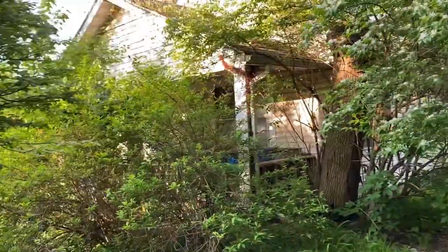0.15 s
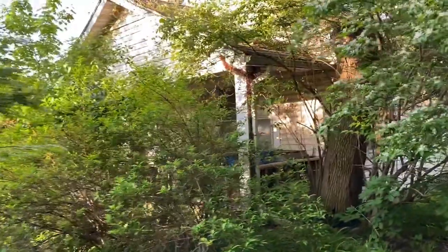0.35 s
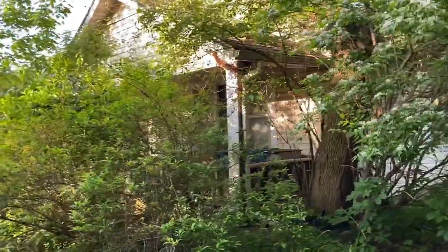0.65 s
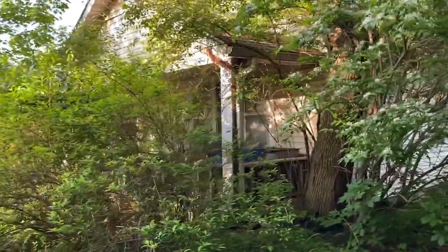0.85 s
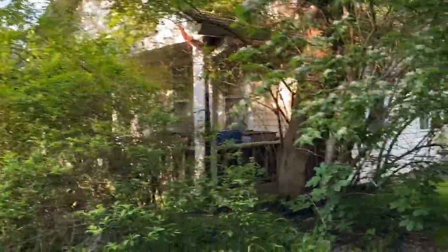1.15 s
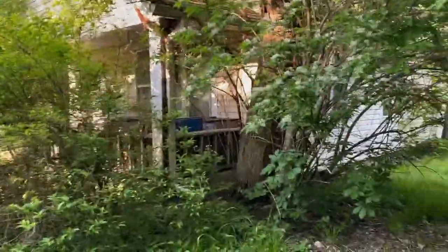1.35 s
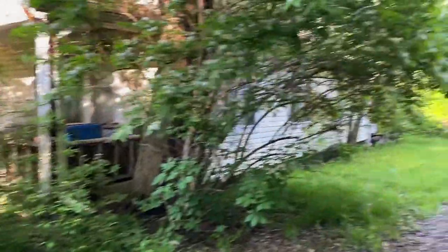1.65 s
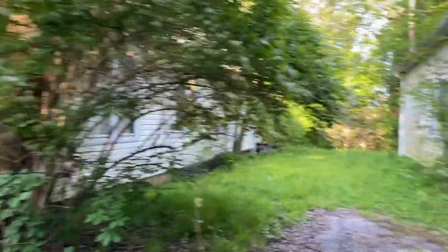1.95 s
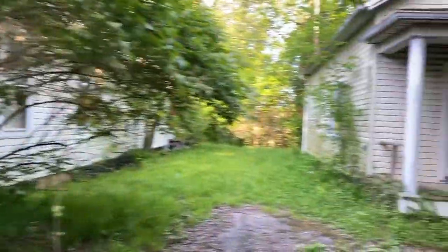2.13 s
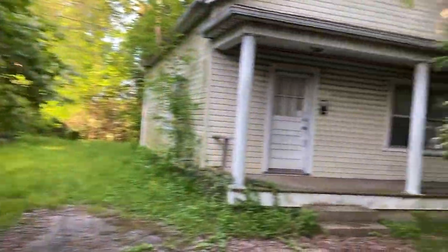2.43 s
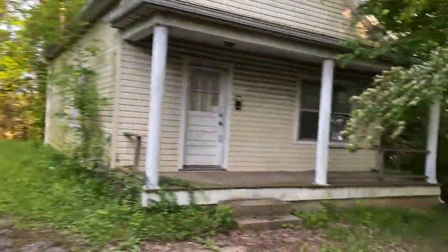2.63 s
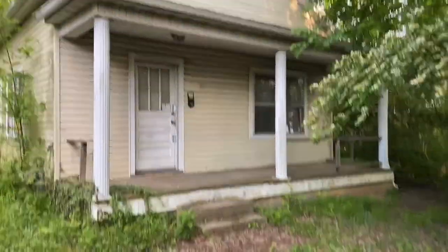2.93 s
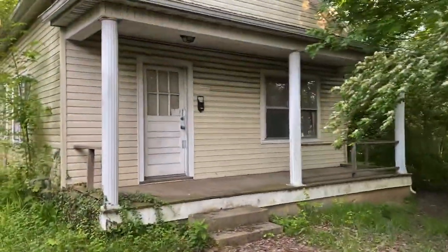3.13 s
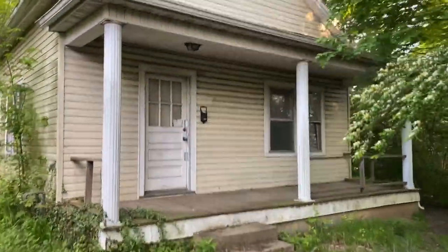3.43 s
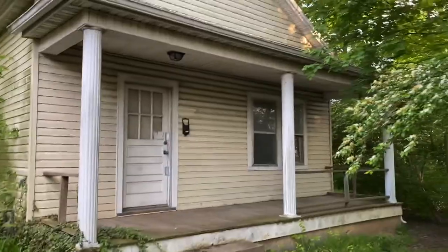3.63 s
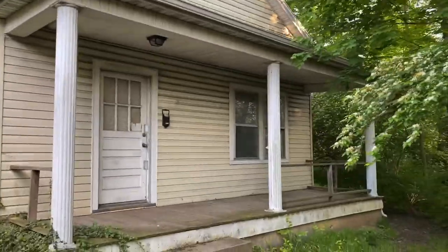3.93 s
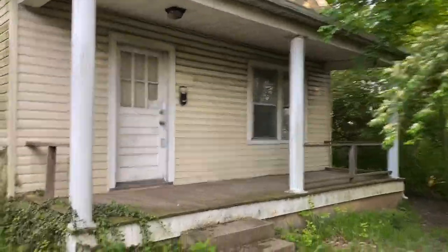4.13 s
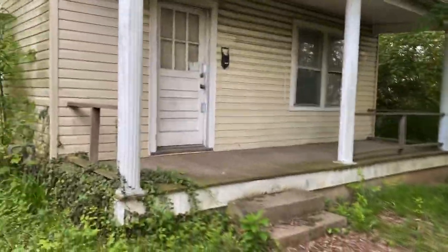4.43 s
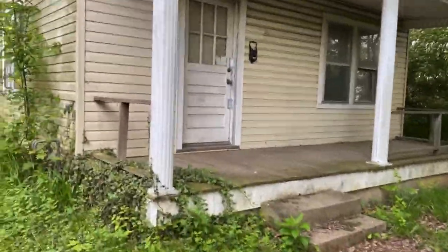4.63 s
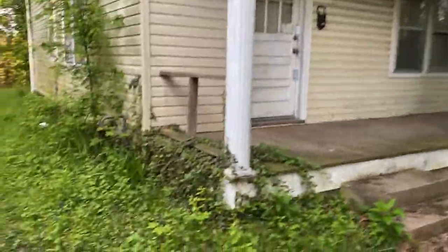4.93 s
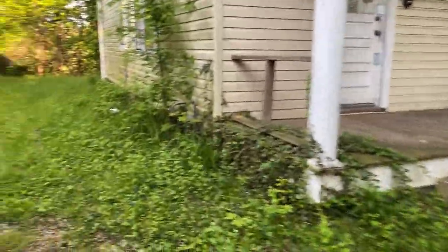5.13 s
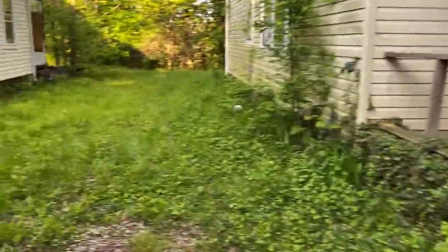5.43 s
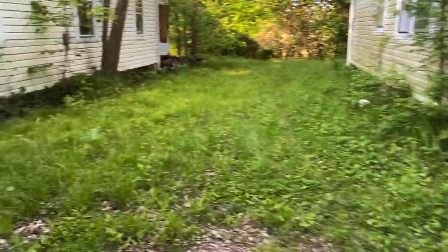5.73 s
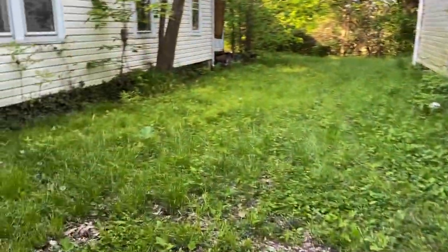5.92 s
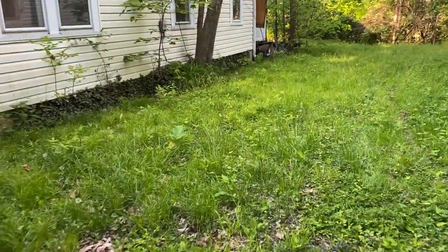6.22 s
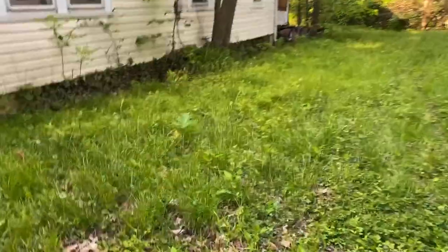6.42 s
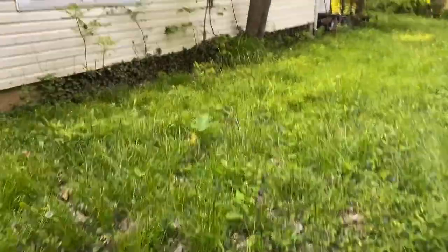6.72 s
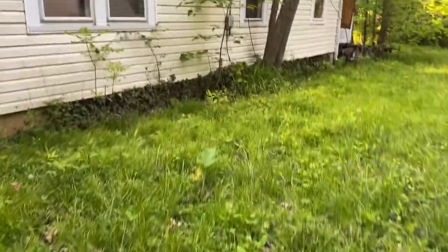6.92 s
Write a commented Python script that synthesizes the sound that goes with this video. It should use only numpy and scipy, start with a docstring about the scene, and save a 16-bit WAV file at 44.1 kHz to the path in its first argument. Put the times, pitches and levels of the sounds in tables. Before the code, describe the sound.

A quiet overgrown yard heard from a walker's handheld stereo microphone. Low wind gusts open over distant wash and blurred bird warbles. Quiet footfalls become clearer crunches with small twig knocks and dry crackles. A short, high bird call repeats roughly every second from the middle on. Later, soft heel thuds and brief grass squeaks join swishier steps, and wind bumps return near the end.

```python
"""Someone walks slowly through long grass in a quiet yard: noise grains swish, rattle and crunch.
From the start wind rumbles as low noise, a distant hum wavers and far warbles blur into noise.
Soon dry stems crackle and twigs snap as struck rings; far birds slur in an echo haze, nearer ones whistle.
Later heels thud as brief damped tones; last to join are grass blades that slip with a squeak and a scrape."""
import sys
import numpy as np
from scipy import signal
from scipy.fft import rfft, irfft
from scipy.io import wavfile
from scipy.ndimage import uniform_filter1d

SR = 44100
rng = np.random.default_rng(int(sys.argv[2]) if len(sys.argv) > 2 else 0)


def output_pcm(signal):
    """Save a mono or channel-first signal as 16-bit PCM at the path in sys.argv[1].

    Samples are clipped to [-1, 1] before scaling.
    """
    pcm = np.clip(np.atleast_2d(signal).T, -1, 1) * 32767
    wavfile.write(sys.argv[1], SR, np.round(pcm).astype(np.int16))


N = 311787
TIME = np.arange(N) / SR
BINS = np.fft.rfftfreq(N, 1 / SR)

# left-right correlation of far sound: (frequency [Hz], likeness [0-1])
FAR_LIKENESS = [(30, 0.7), (150, 0.81), (500, 0.17), (1000, 0.017), (2500, 0.18), (11000, 0.17)]
# larger twigs breaking: (time [s], relative knock level [dB], knock pitch [Hz], relative crack level [dB])
TWIG_BREAKS = [(0.5817, -33.5, 920, -38.5), (0.7132, -38, 1780, -44), (1.144, -42.5, 1600, -62),
               (1.6904, -29, 1400, -62), (1.6989, -21, 1800, -61), (1.703, -26, 1840, -65),
               (1.7427, -32.5, 765, -62), (1.8254, -34.5, 940, -42), (1.8661, -21.5, 1170, -34.5),
               (2.345, -35.5, 970, -59), (2.414, -13, 1200, -20.5), (2.735, -38, 1020, -44.5),
               (2.822, -35.5, 868, -36.5), (3.24, -38.5, 1490, -42), (3.474, -31, 930, -70),
               (3.484, -34.5, 1070, -35), (3.935, -38.5, 1630, -56), (4.035, -40.5, 1750, -37),
               (5.012, -36, 1090, -75), (5.1346, -40.5, 1200, -34.5), (5.7929, -27, 1180, -40),
               (5.8718, -35, 1020, -58), (5.9, -44, 1050, -51), (5.921, -39, 965, -50),
               (6.1753, -39.5, 1320, -64), (6.3069, -33.5, 660, -41), (6.3427, -36.5, 1160, -58),
               (6.7555, -45, 1500, -52), (6.8479, -30.5, 1160, -56)]


def amp(db):
    """Decibels to gain."""
    return 10 ** (np.asarray(db) / 20)


def unit(x):
    """Scales to rms 1."""
    return x / np.sqrt(np.mean(x ** 2) + 1e-20)


def read(points, hz):
    """Reads a spectrum on a log-frequency axis."""
    f, value = np.transpose(points)
    return np.interp(np.log(hz + 1), np.log(f + 1), value)


def follow(rows):
    """Joins the rows of a control table by straight lines: one curve a column."""
    s, *columns = np.transpose(rows)
    return [np.interp(TIME, s, c) for c in columns]


def add(mix, s, sound):
    """Lays a sound into the mix at time s."""
    part = mix[max(round(s * SR), 0):][:len(sound)]
    part += sound[:len(part)]


def swell(peak_s, width_s):
    """Gaussian rise and fall around one moment."""
    return np.exp(-((TIME - peak_s) / width_s) ** 2)


def drift(rate_hz):
    """Smooth noise of rms 1, changing up to about rate_hz times a second."""
    spectrum = rfft(rng.standard_normal(N))
    return unit(irfft(spectrum * np.exp(-(BINS / rate_hz) ** 2), N))


def ring(points, stretch=1, size=4096):
    """Causal minimum-phase ring of energy 1 with the given spectrum, stretched in pitch."""
    hz = abs(np.fft.fftfreq(size, 1 / SR)) / stretch
    log_gain = np.log(amp(read(points, hz)))
    response = np.fft.ifft(np.exp(signal.hilbert(log_gain).conj())).real[:size // 2]
    return response / np.linalg.norm(response)


def colour(x, points):
    """Passes both channels through a ring."""
    return signal.oaconvolve(x, ring(points)[None], axes=1)[:, :N]


def pair(x, likeness):
    """Blends two unrelated signals into a left and right that are partly alike."""
    a, b = rfft(x)
    same = np.clip(read(likeness, BINS), 0, .99)
    mid = a * np.sqrt((1 + same) / 2)
    side = b * np.sqrt((1 - same) / 2)
    return irfft(np.array([mid + side, mid - side]), N)


def from_below(x):
    """Ground sound bends round the microphones' housing: phase and level differ between the two ports."""
    # (frequency [Hz], left lead [rad])
    port_phase = [(0, 0), (1700, -.1), (4700, 2.1), (5700, 4.4), (8300, 8.4), (9400, 7.9), (13500, 3.4),
                  (15500, .1)]
    # (frequency [Hz], left minus right [dB])
    port_balance = [(60, -2.5), (1200, -3), (2500, -3), (4000, -0.5), (5400, 5.5), (6800, -7), (8200, -6),
                    (10000, 0.5)]
    f, phase = np.transpose(port_phase)
    turn = np.exp(-1j * np.interp(BINS, f, phase))
    tilt = amp(read(port_balance, BINS) / 2)
    return irfft(rfft(x) * np.array([tilt, turn / tilt]), N)


def grains(per_s, spread_db, smooth, flicks_per_s, flick_decay_s, steady, patchy_db):
    """Tiny fractures over smooth rubbing, in bursts as single stems spring free; two unrelated trains."""
    size = amp(spread_db * np.minimum(rng.exponential(1, (2, N)), 4.5))
    struck = rng.random((2, N)) < per_s / SR
    clicks = unit(size * rng.choice([-1, 1], (2, N)) * struck)
    share = np.clip(smooth, 0, 1)
    both = np.sqrt(1 - share) * clicks + np.sqrt(share) * rng.standard_normal((2, N))
    # each flick starts at once and decays exponentially
    flicks = rng.random(N) * (rng.random(N) < flicks_per_s / SR)
    bursts = unit(signal.lfilter([1], [1, -np.exp(-1 / (flick_decay_s * SR))], flicks))
    # every stem has its own pitch, so the colour shifts from moment to moment
    z = signal.stft(both * (steady + bursts), nperseg=128)[2]
    patches = uniform_filter1d(rng.standard_normal(z.shape[1:]), size=4, axis=0)
    patches = unit(uniform_filter1d(patches, size=12, axis=1))
    return unit(signal.istft(z * amp(patchy_db * patches), nperseg=128)[1][:, :N])


def outdoors(x, t60_s, delay_s):
    """Sparse decaying echoes scattered by leaves and house walls."""
    t = np.arange(SR // 2) / SR
    hits = rng.random((2, len(t))) < 2500 / SR
    taps = rng.standard_normal((2, len(t))) * hits * amp(-60 * t / t60_s) * (t > delay_s)
    taps = taps / np.linalg.norm(taps, axis=1, keepdims=True)
    return signal.oaconvolve(x[None], taps, axes=1)[:, :N]


def wind():
    """Low eddies on the microphone: a light breeze with a few gusts."""
    # (frequency [Hz], relative density [dB per Hz])
    wind_colour = [(20, -21.5), (32, -16.5), (42, -8.5), (55, 1.5), (105, -4.5), (200, -19.5), (450, -50.5),
                   (1500, -108)]
    # (time [s], level [dB])
    breeze = [(0, -49), (1.2, -52), (1.3, -60.5), (2.93, -60), (3.02, -52), (4.9, -53.5), (5.3, -50.5),
              (5.95, -51.5), (6.15, -58.5), (7.07, -47)]
    # swells over the breeze: (peak time [s], half width [s], level [dB])
    gusts = [(.19, 0.052, -37.5), (.53, 0.15, -38.5), (1.79, 0.22, -49.5), (6.3, 0.063, -44.5),
             (6.415, 0.045, -38), (6.53, 0.11, -42.5), (6.95, 0.22, -50.5)]
    breeze_db, = follow(breeze)
    gust_power = sum((amp(db) * swell(s, width_s)) ** 2 for s, width_s, db in gusts)
    power = amp(breeze_db) ** 2 + gust_power
    eddies = pair(colour(rng.standard_normal((2, N)), wind_colour), FAR_LIKENESS)
    # flatten the noise's own level so that the curve sets it
    strength = np.sqrt(uniform_filter1d((eddies ** 2).mean(0), size=4000))
    return eddies / strength * np.sqrt(power)


def yard():
    """A wash of far traffic and leaves that swells once, and a wavering machine hum on the right."""
    # far surroundings: (frequency [Hz], relative density [dB per Hz])
    yard_colour = [(30, -12), (70, 7.5), (160, 4.5), (280, -2.5), (420, -3.5), (750, 0.5), (1100, -3),
                   (1600, -9.5), (2400, -22.5), (4500, -27.5), (5500, -33.5), (7400, -35.5), (8150, -27),
                   (8800, -39), (16000, -43.5)]
    # machine hum: (time [s], relative level [dB])
    hum_levels = [(2.2, -62.5), (2.5, -53), (2.8, -52.5), (3.5, -56.5), (4.9, -61.5), (5.3, -58),
                  (6.9, -51.5)]
    air = grains(per_s=3000, spread_db=2.5, smooth=0.93, flicks_per_s=79, flick_decay_s=0.014,
                 steady=22.0, patchy_db=1.92)
    wash = pair(colour(air, yard_colour), FAR_LIKENESS) * amp(-57.5 + 2 * swell(3.34, 0.6))
    level_db, = follow(hum_levels)
    hum_hz = 156.5 + 1.384 * drift(5.8)
    hum_gain = amp(level_db - 2.5 + 1.7 * drift(8.3))
    hum = np.sqrt(2) * np.sin(2 * np.pi * np.cumsum(hum_hz) / SR) * hum_gain
    return wash * amp([[-.3], [.3]]) + hum * amp([[-2.6], [1.8]])


def gait():
    """Stirring of blades, stalks and litter: a foot lands, presses and lets go; the other leg swings by."""
    # a little under two a second: (time [s], rise [s], relative blades, stalks, litter level [dB])
    footfalls = [(-.06, 0.052, -78.5, -69, -59), (0.496, 0.014, -73.5, -69.5, -56),
                 (1.04, 0.17, -78, -67.5, -77), (1.638, 0.033, -70, -60, -51.5),
                 (2.27, 0.039, -71.5, -65, -54.5), (2.8, 0.1, -68, -84, -51.5),
                 (3.4, 0.074, -71.5, -85, -51), (3.949, 0.067, -67, -71, -52.5),
                 (4.51, 0.032, -64, -59, -55), (5.078, 0.12, -67, -70.5, -53.5),
                 (5.68, 0.05, -62.5, -67, -49), (6.267, 0.02, -70.5, -78, -52.5),
                 (6.843, 0.035, -72, -77, -52)]
    # leg through taller growth: (peak time [s], half width [s], relative level [dB])
    sweeps = [(.13, 0.13, -82.5), (.67, 0.03, -85), (1.26, 0.026, -73.5), (1.53, 0.1, -79),
              (3.04, 0.038, -86), (3.25, 0.063, -74.5), (4.3, 0.21, -82.5), (4.73, 0.067, -75.5),
              (5.34, 0.087, -80.5), (5.6, 0.15, -73), (5.92, 0.12, -75), (6.18, 0.095, -76.5),
              (6.5, 0.056, -83), (7.06, 0.033, -80)]
    # what the passing leg stirs: blades, stalks, litter gain [dB]
    sweep_mix_db = [2.5, 2.5, 7]
    hold_s, settle_db_per_s = 0.0084, 90.5
    shake_db, shake_db_per_s = -38, 203
    power = np.zeros((3, N))
    for s, rise_s, *levels_db in footfalls:
        landing = np.sin(np.pi / 2 * np.clip((TIME - s) / rise_s, 0, 1)) ** 2
        settling = amp(-settle_db_per_s * np.maximum(TIME - s - rise_s - hold_s, 0))
        power += (amp(levels_db)[:, None] * landing * settling) ** 2
    sweeping = sum((amp(db) * swell(s, width_s)) ** 2 for s, width_s, db in sweeps)
    power += amp(sweep_mix_db)[:, None] ** 2 * sweeping
    # each twig's crack shakes the blades around it
    for s, _, _, crack_db in TWIG_BREAKS:
        shake = amp(crack_db + shake_db - shake_db_per_s * TIME[:SR // 2])
        add(power[0], s, shake ** 2)
    return np.sqrt(power)


def steps():
    """Each stroke of a leg swishes soft blades, rattles stiff stalks and crushes dull litter."""
    # three spectra: (frequency [Hz], relative density [dB per Hz])
    swish_colour = [(500, -52), (2000, 3.5), (4500, 8), (6000, 5.5), (8000, 7), (12000, 1.5), (13500, 0.5),
                    (16000, -9.5)]
    stalk_colour = [(200, -54), (700, -20), (1500, 9), (2500, 1), (4200, 0.5), (12000, -26)]
    crunch_colour = [(100, -17), (250, -4.5), (500, -3.5), (900, 6), (1500, -6.5), (3200, -14), (8000, -61)]
    # left-right correlation: (frequency [Hz], likeness [0-1])
    near_likeness = [(200, 1), (1200, 0.82), (4500, 0.046), (8000, 0.78), (10500, 1)]
    brush, bend, weight = gait()
    blades = grains(per_s=840, spread_db=3.5, smooth=.45, flicks_per_s=170, flick_decay_s=0.0042,
                    steady=1.8, patchy_db=3.0) * brush * amp(5.5)
    stalks = grains(per_s=310, spread_db=2.0, smooth=0.5, flicks_per_s=110, flick_decay_s=0.0037,
                    steady=0.58, patchy_db=4.0) * bend * amp(2.5)
    litter = grains(per_s=400, spread_db=2.0, smooth=0.59, flicks_per_s=92, flick_decay_s=0.012,
                    steady=2.4, patchy_db=4.0) * weight * amp(-5.0)
    rustle = colour(blades, swish_colour) + colour(stalks, stalk_colour) + colour(litter, crunch_colour)
    return from_below(pair(rustle, near_likeness))


def warbles(direct_db=-3, echo_db=-4, waver_share=0.0304):
    """Far birds: quick, uneven pitch swings, smeared into narrow-band noise by the leaves on the way."""
    # (time [s], length [s], pitch [Hz], relative level [dB])
    warble_notes = [(0, 0.28, 1629, -63), (0.053, 0.033, 4120, -63), (1.356, 0.25, 1632, -64.5),
                    (1.392, 0.1, 3080, -66.5), (1.583, 0.076, 1500, -54.5), (1.712, 0.15, 4120, -65.5),
                    (2.981, 0.094, 1550, -59.5), (3.644, 0.095, 3960, -68), (4.421, 0.098, 3740, -67.5)]
    turns_per_s, swing_share, uneven_share, blur_hz = 33, 0.09, .35, 290
    out = np.zeros(N)
    waver = waver_share * drift(57)
    blur = drift(blur_hz) + 1j * drift(blur_hz)
    pace = turns_per_s * (1 + uneven_share * drift(turns_per_s))
    for s, length_s, hz, db in warble_notes:
        at = max(int(s * SR), 0) + np.arange(int(length_s * SR))
        swing = swing_share * np.cos(2 * np.pi * np.cumsum(pace[at]) / SR)
        pitch_hz = hz * (1 - swing + waver[at])
        carrier = np.exp(2j * np.pi * np.cumsum(pitch_hz) / SR)
        note = signal.windows.tukey(len(at), .5) * (blur[at] * carrier).real
        add(out, s, amp(db) * unit(note) / np.sqrt(2))
    return amp(direct_db) * out + amp(echo_db) * outdoors(out, t60_s=0.23, delay_s=0.00603)


def crackles(split_s=0.00093, fibres_per_s=12000, gain_db=3):
    """Dry stems and dead leaves split as a quick run of fibres letting go, ever weaker on average."""
    # (time [s], relative body level [dB], relative crisp top level [dB])
    splits = [(0.5181, -55, -55), (0.714, -44.5, -52), (1.031, -54.5, -60.5), (1.0783, -47.5, -59),
              (1.109, -50, -66), (1.254, -59, -48), (1.2795, -47, -49), (1.3456, -48.5, -57),
              (1.7243, -56, -48), (2.8785, -51, -59), (2.8838, -42.5, -56), (2.9204, -45, -51),
              (2.9756, -48.5, -56), (3.2173, -50.5, -51), (3.493, -56, -45.5), (3.971, -49.5, -49),
              (4.4896, -48, -78), (4.541, -42.5, -61), (4.557, -44, -43), (4.896, -53, -56),
              (4.91, -48.5, -57), (5.09, -48.5, -54), (5.2332, -50, -43), (5.6114, -67, -47),
              (5.6468, -50, -49), (6.866, -51, -69), (6.8768, -47.5, -51), (7.051, -55, -52)]
    # two spectra: (frequency [Hz], relative density [dB per Hz])
    body_colour = [(150, -19.5), (700, -3.5), (1700, 1.5), (2600, -5.5), (4500, -10.5), (7000, -33),
                   (16000, -76)]
    top_colour = [(1500, -49), (4000, -5), (6000, 8.5), (11500, 2), (16000, -4.5)]
    out, t = np.zeros(N), np.arange(SR // 50) / SR
    body, top = ring(body_colour), ring(top_colour)
    for s, body_db, top_db in splits:
        struck = rng.random(len(t)) < fibres_per_s / SR
        fibres = rng.standard_normal(len(t)) * struck * np.exp(-t / split_s)
        fibres[0] = 1
        for tone, db in (body, body_db), (top, top_db):
            split = signal.fftconvolve(fibres, tone)
            add(out, s, amp(db + gain_db) * split / abs(split).max())
    return from_below(out) + amp(-5) * outdoors(out, t60_s=0.21, delay_s=0.0024)


def twigs(crack_decay_s=0.00064, crack_lead_s=.0007, crack_db=-9.5):
    """Fibres part with a bright crack, then the stick gives one dull knock that the soil damps at once."""
    # knock of a twig pitched at knock_hz: (frequency [Hz], relative level [dB])
    knock_colour = [(40, -5), (180, -6.5), (400, -12), (650, 3), (1150, 8.5), (1950, -2.5), (2700, -16.5),
                    (16000, -77)]
    # parting fibres: (frequency [Hz], relative level [dB])
    crack_colour = [(1500, -19), (4200, 2.5), (6000, -7), (10500, -1.5), (16000, -15.5)]
    knock_hz = 1200
    out, t = np.zeros(N), np.arange(300) / SR
    noises = rng.standard_normal((len(TWIG_BREAKS), len(t)))
    for (s, db, hz, bright_db), fibres in zip(TWIG_BREAKS, noises):
        knock = ring(knock_colour, hz / knock_hz)
        outline = abs(signal.hilbert(knock))
        # the knock peaks at s
        add(out, s - outline.argmax() / SR, amp(db - 2.47) * knock / outline.max())
        parting = fibres * t * np.exp(-t / crack_decay_s)
        crack = signal.fftconvolve(ring(crack_colour), parting)
        add(out, s - crack_lead_s, amp(bright_db + crack_db) * crack / abs(crack).max())
    return from_below(out) + amp(-21.5) * outdoors(out, t60_s=0.29, delay_s=.003)


def far_song(count=80, low_hz=2300, high_hz=4100, db=-76):
    """Far birds overlap in quick, random slurs that arrive only as a haze of echo."""
    out, u = np.zeros(N), np.linspace(0, 1, SR // 20)
    starts_s = np.linspace(.7, 1.65, count)
    for s, (a, b, c) in zip(starts_s, rng.random((count, 3))):
        # each slur bends up or down by about a third (a fifth of its starting pitch)
        hz = (low_hz + (high_hz - low_hz) * a) * (1 + 0.2 * np.sign(b - .5) * u)
        note = np.sin(np.pi * u) * np.sin(2 * np.pi * np.cumsum(hz) / SR)
        add(out, s + 0.067 * c, amp(db) * note)
    return outdoors(out, t60_s=0.22, delay_s=0.007)


def bird_notes():
    """Every whistle as (s, pitch curve Hz, relative dB): hooked calls, their after-notes, single slurs."""
    # single slurs of other birds: (time [s], length [s], start [Hz], end [Hz], relative level [dB])
    slurs = [(0.936, 0.038, 4740, 3600, -69), (4.181, 0.05, 9150, 6000, -58)]
    # near bird's calls: (time [s], pitch [Hz], relative level [dB])
    calls = [(2.299, 7430, -57.5), (2.928, 7080, -44), (3.771, 6880, -49.5), (4.711, 7140, -59),
             (5.522, 7480, -51.5)]
    # call that dips and recovers: (share of the call [0-1], pitch ratio [1], relative level [dB])
    hook = [(0, 1.27, -17), (.17, 1.11, -7.5), (.38, .925, -2), (.6, .985, -3.5), (1, 1.03, -1.5)]
    # softer, lower note after each of the loudest calls: (time [s], pitch [Hz], relative level [dB])
    answers = [(3.05, 6300, -59), (3.889, 5720, -62)]
    hook_s, answer_s = 0.046, 0.03
    answer_from = 0.81  # scoops up from this share of its pitch
    slur_bend = 1.3  # a slur starts level, moves ever faster and flattens at its end
    share, ratio, shape_db = np.transpose(hook)
    u = np.linspace(0, 1, int(hook_s * SR))
    v = np.linspace(0, 1, int(answer_s * SR))
    notes = [(s, hz * np.interp(u, share, ratio), db + np.interp(u, share, shape_db))
             for s, hz, db in calls]
    lift = answer_from + (1 - answer_from) * np.sin(np.pi / 2 * np.sqrt(v))
    notes += [(s, hz * lift, db) for s, hz, db in answers]
    for s, length_s, start_hz, end_hz, db in slurs:
        w = np.linspace(0, 1, int(length_s * SR))
        glide = np.sin(np.pi / 2 * w ** slur_bend) ** 2
        notes.append((s, start_hz + (end_hz - start_hz) * glide, db))
    return notes


def birds(direct_db=-4.0, echo_db=-4, waver_share=0.0097, near_db=-54, hidden=0.1, taper=0.19):
    """Thin sine whistles linger among the trees; the faint, far ones lose some of their direct sound."""
    sung, direct = np.zeros((2, N))
    waver = 1 + waver_share * drift(320)
    for s, hz, db in bird_notes():
        turns = np.cumsum(hz * waver[int(s * SR):][:len(hz)]) / SR
        note = amp(db) * signal.windows.tukey(len(hz), taper) * np.sin(2 * np.pi * turns)
        add(sung, s, note)
        add(direct, s, note * amp(direct_db + hidden * min(np.max(db) - near_db, 0)))
    return direct + amp(echo_db) * outdoors(sung, t60_s=0.24, delay_s=0.005)


def thuds(cycles=0.54, sag_s=0.19):
    """The heel lands on soft soil with a short, low push of sagging pitch that dies in a cycle or two."""
    # (time [s], starting pitch [Hz], level [dB])
    heels = [(1.626, 222, -41.5), (1.867, 214, -41.5), (3.404, 440, -46.5), (5.098, 474, -39.5),
             (5.729, 470, -42.5), (6.39, 171, -42), (6.848, 413, -41)]
    out, t = np.zeros(N), np.arange(SR // 16) / SR
    for s, hz, db in heels:
        age = t * hz / cycles
        push = age * np.exp(1 - age)
        add(out, s, amp(db) * push * np.sin(2 * np.pi * hz * t * (1 - t / sag_s)))
    return out


def slips(squeak=0.36, scrape=0.22):
    """A taut grass blade slides off a shoe: a short scrape with a thin, jittery pitch in it."""
    # (time [s], length [s], pitch [Hz], relative level [dB])
    slides = [(3.202, 0.016, 9060, -51), (4.725, 0.013, 10060, -51), (5.824, 0.014, 11800, -43.5),
              (5.898, 0.015, 9940, -41.5)]
    out = np.zeros(N)
    treble = signal.butter(2, [3500, 13000], "band", fs=SR, output="sos")
    for s, length_s, hz, db in slides:
        u = np.linspace(0, 1, int(length_s * SR))
        rub, jitter = rng.standard_normal((2, SR // 10))[:, :len(u)]
        tone = np.sin(2 * np.pi * np.cumsum(hz * (1 + 0.059 * jitter)) / SR)
        rasp = unit(signal.sosfilt(treble, rub))
        envelope = np.sin(np.pi * np.sqrt(u)) ** 2
        add(out, s, amp(db) * envelope * (squeak * tone + scrape * rasp))
    return from_below(out)


def scene():
    """The walker's sounds in the open yard, with the birds in the trees to the right."""
    trees = (warbles() + far_song() + birds()) * amp([[-2], [1.7]])
    ground = steps() + crackles() + twigs() + thuds() + slips()
    return wind() + yard() + ground + trees


def record(dry):
    """Band limit: a linear-phase lowpass."""
    cutoff_hz = 15900
    lowpass = signal.firwin(511, cutoff_hz, window=("kaiser", 9), fs=SR)
    return signal.oaconvolve(dry, lowpass[None], "same")


dry = scene()
out = record(dry)
output_pcm(out)
```